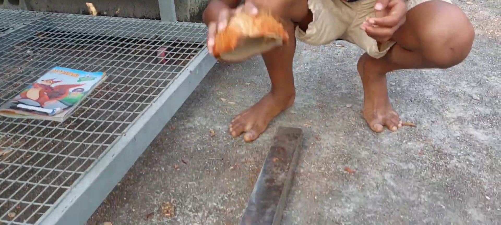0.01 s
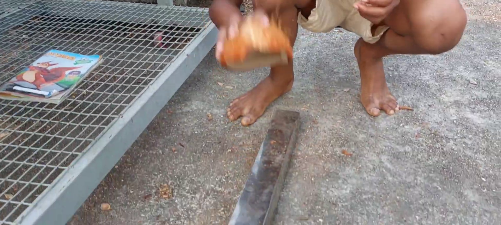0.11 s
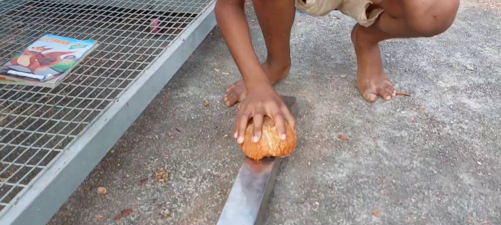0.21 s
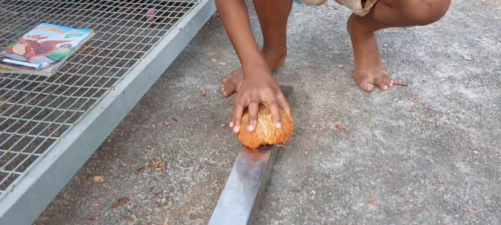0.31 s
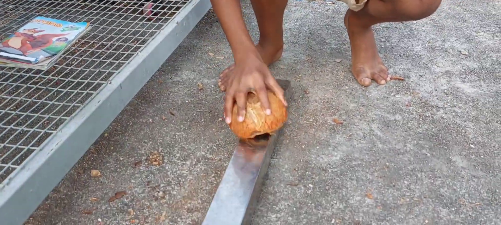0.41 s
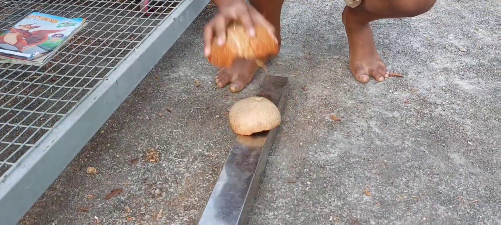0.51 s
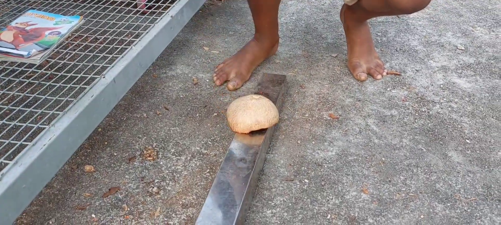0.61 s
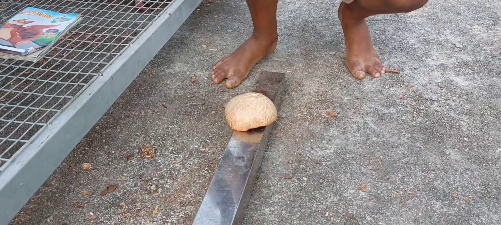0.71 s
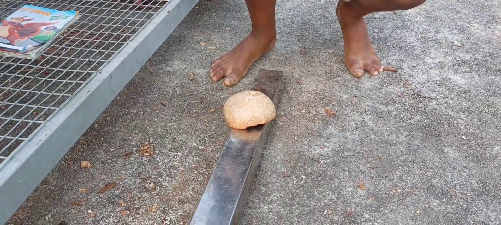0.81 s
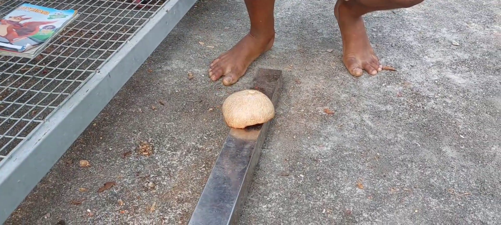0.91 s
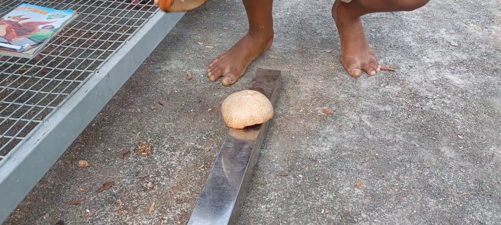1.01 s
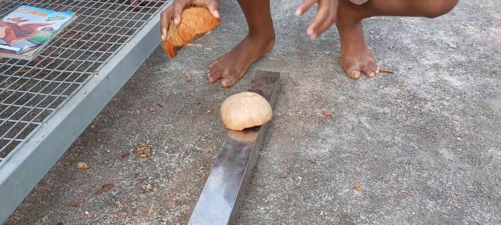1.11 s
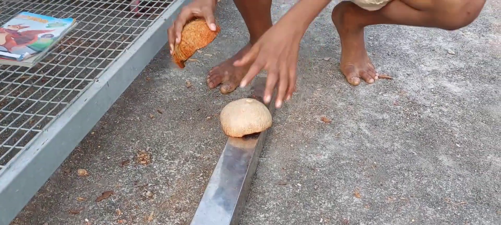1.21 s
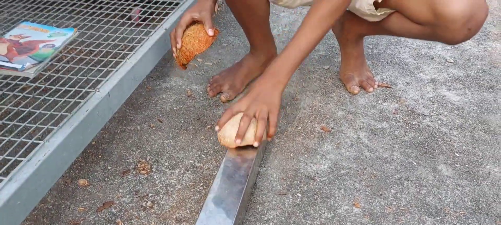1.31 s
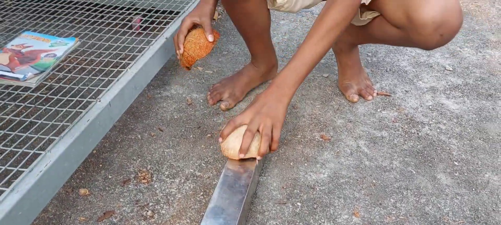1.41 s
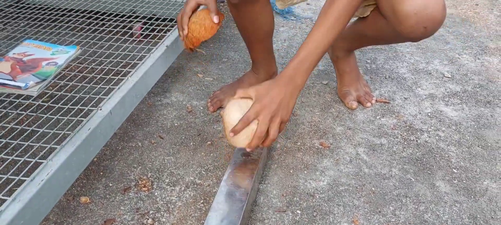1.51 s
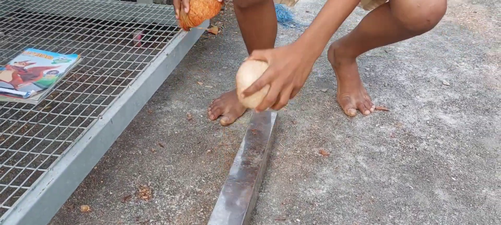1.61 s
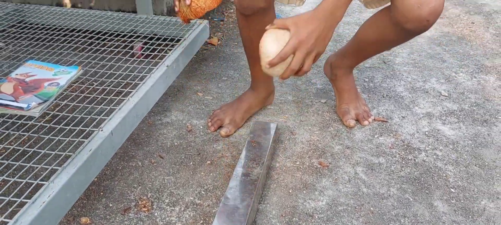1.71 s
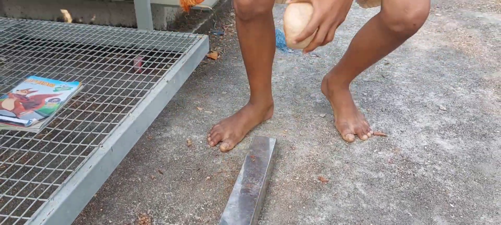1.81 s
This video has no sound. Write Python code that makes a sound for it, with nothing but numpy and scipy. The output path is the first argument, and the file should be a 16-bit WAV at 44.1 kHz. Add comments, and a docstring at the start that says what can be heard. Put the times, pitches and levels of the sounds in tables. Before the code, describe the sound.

A coconut half is slammed onto a steel bar on concrete: one very loud, clipped crack with a low thud and short metallic ring, then quiet open air, faint crows and light handling scrapes, close stereo microphone.

```python
"""Outdoors under a roof edge, a dried coconut half is slammed on a hollow steel bar lying on concrete.
The bar still rings from a blow before: its modes are decaying sines, muffled by a hand until the shell lifts.
The slam adds struck modes of shell and bar, ground knocks, a crack, a noise crash and a soft push of air.
Later a hand slides and picks up the kernel: noise grains rustle and slips excite resonances. Far crows drone as
throbbing noise over a hoot, faint tones come and go, a breeze rises on the microphone ports over steady hiss."""
import sys
import numpy as np
from scipy import signal
from scipy.io import wavfile

SR = 44100
rng = np.random.default_rng(int(sys.argv[2]) if len(sys.argv) > 2 else 0)


def magnitude_from_level(level_db):
    """Linear magnitude for a level in decibels (20 dB per decade)."""
    exponent = np.asarray(level_db, float) / 20
    return 10 ** exponent


def bounce(signal):
    """Save signal as a 16-bit WAV file at the path given by the first command-line argument."""
    frames = np.transpose(np.atleast_2d(signal))
    limited = np.clip(frames, -1, 1)
    pcm = np.round(limited * 32767).astype(np.int16)
    wavfile.write(sys.argv[1], SR, pcm)


N = 81585

# In all tables: balance_db is left minus right, lead_rad is how far the left port leads,
# t60_s is the time to fall by 60 dB, likeness is how alike the two ports are (limited to -1..1).

# Steady outdoor floor: pitch_hz, relative_db_per_hz
AIR_COLOUR = [(24, -29), (40, 1.5), (201, -7), (663, -36), (812, -11.5), (880, -27), (1240, -13),
              (1520, -22.5), (1970, -8.5), (2670, -31.5), (5000, -25), (6500, -55), (11000, -120)]
# Steady microphone hiss, with a bump near 8 kHz: pitch_hz, relative_db_per_hz
HISS_COLOUR = [(2650, -32), (4500, -2), (5630, -8.5), (7900, -1.5), (9980, -8), (10500, -13.5),
               (11400, -13.5), (15600, -20.5)]
# Balance of floor, hiss and rustle: pitch_hz, balance_db
AIR_BALANCE = [(60, 4.5), (110, 9.5), (200, 4), (380, 3.0), (700, -3.5), (1290, -5.5), (2380, 1.5),
               (4400, 0.5), (8120, 0.5), (15000, -7)]
# How alike floor, hiss and rustle are on both ports: pitch_hz, likeness
AIR_LIKENESS = [(60, 1), (130, 1), (290, 0.44), (640, -0.43), (1410, -0.27), (3100, -1.5), (6820, 0.73),
                (15000, -0.55)]
AIR_DB, HISS_DB = -68.5, -81.5

# Pitches of the bar's modes: pitch_hz
BAR_HZ = [1099, 1538, 2275, 2383, 2536, 2692, 2876, 3279, 3497, 3742, 4243, 5812]
# The same bar modes: slam_db, held_t60_s, held_balance_db, lift_gain_db, free_t60_s, free_balance_db,
# lead_rad, old_ring_start_db, rocking_dip_db (a negative dip is a boost)
BAR_MODES = [(-24.5, 0.73, 3.5, 0, .7, -3, 1.26, -59, 15), (-24.5, 0.6, 5.5, -2, 0.65, 3.5, 1.5, -89.5, 6),
             (-16, 0.25, -0.9, 2, 0.25, 2.5, 0.56, -76.5, 2.5),
             (-20.5, 0.75, 8, 1.5, 0.42, 3.5, 0.52, -71.5, 0),
             (-23, .65, -5, 6.5, 1.34, 13.5, -0.15, -43, 0.5), (-25, 0.62, 0.5, -4, .5, 6, 1.71, -72, 2),
             (-25.5, 0.9, 0.54, 4, 1.05, 1.5, 2.5, -68, 0.5),
             (-23, 0.37, -7, -12.5, 1.3, 10.5, 1.76, -61, 6), (-30.5, 0.55, -3, 2.5, .65, -3.5, -1, -85, 0),
             (-29.5, 0.68, -7.5, 15, 0.67, 0.5, 1.5, -59, 8.5),
             (-38, 0.9, -6, 0.7, 1.05, -6.5, 1.1, -62, -4), (-34, 0.49, 2.5, -0.5, .5, 8, -0.2, -100, 2.5)]
OLD_RING_EXTRA_LEAD_RAD = 2.4
SLAM_S, LIFT_S, LIFT_RISE_S = 0.2081, 0.432, 0.012
ROCKS_PER_S, ROCK_FADE_S = 14.3, 0.28
SWELL_CYCLES = 4.0

# Drone of the crows over time: time_s, relative_db
CROW_LEVEL = [(0, -80), (.2, -88.5), (.5, -69), (.7, -70), (1.0, -75.5), (1.2, -71.5), (1.42, -76.5),
              (1.6, -68), (1.85, -61.5)]
# Throat resonances of the crows: pitch_hz, width_hz, relative_db
THROATS = [(1180, 420, -5), (1840, 170, -1), (1320, 9.3, -9.5), (1916, 89, -7), (3620, 170, -16)]
THROBS_PER_S = 82
# A far hoot comes and goes: time_s, relative_db
HOOT_LEVEL = [(0, -88), (.09, -101), (.12, -75), (.55, -70.5), (.7, -68), (.96, -72.5), (1.01, -87),
              (1.07, -69), (1.24, -80), (1.3, -68), (1.43, -80), (1.5, -70.5), (1.6, -71.5), (1.68, -84),
              (1.8, -67), (1.85, -73)]
HOOT_HZ, HOOT_WAVER_HZ = 794.3, 4.4

# Breeze over time, before its lumps: time_s, level_db
BREEZE_LEVEL = [(0, -70), (.05, -77.5), (.2, -72.5), (.3, -55.5), (.45, -62.5), (.65, -67), (.8, -73.5),
                (1.0, -71.5), (1.3, -73), (1.45, -70.5), (1.6, -67.5), (1.68, -60.5), (1.74, -63.5),
                (1.79, -54.5), (1.85, -56)]
BREEZE_LOW_HZ, BREEZE_HIGH_HZ, BREEZE_BALANCE_DB = 54.6, 225, 3.5
BREEZE_SHARED = 0.4  # part of the power that both ports share

# Thin far tones: pitch_hz, level_db, start_s, end_s
FAINT_TONES = [(940, -70, 0.025, 0.3), (1470, -72, 0.12, .2), (283, -67, 0.081, 0.396),
               (1235, -71.5, 0.87, 1.3), (1415, -69.5, 0.79, 1.3), (3070, -66.5, 1.82, 2)]

# Pitches of the struck modes of shell and bar, some beating with the bar's modes above: pitch_hz
STRUCK_HZ = [285, 576, 675, 720, 940, 1300, 1432, 1670, 1708, 1781, 1857, 1906, 1938, 2030, 2133, 2217,
             2568, 3100, 3400, 3784, 867, 1147, 1249, 2372, 790]
# The same struck modes, short and long: level_db, t60_s, balance_db, lead_rad
STRUCK_MODES = [(-18, 0.073, 8, 0.63), (-29, 0.23, -5.5, 1.56), (-38.5, 0.56, -4, 0.47),
                (-26.5, 0.16, -3.5, 2), (-28, 0.16, -0.54, 2.26), (-26.5, 0.21, 0.13, 0.3),
                (-25, 0.1, 0.65, 2), (-16.5, 0.34, 1.5, 0.46), (-21.5, 0.18, -0.24, 0.9),
                (-21, 0.14, -0.67, 1), (-15.5, 0.36, -6, -2.5), (-17.5, 0.076, 0.57, 4.5),
                (-13, .22, -6.5, -0.8), (-26.5, 0.34, -0.6, 0.87), (-18, 0.59, -0.2, -3.5),
                (-14, 0.46, -3.5, 0.96), (-30.5, 0.97, -6, 2), (-26.5, 0.18, -0.36, 1.44),
                (-25, 0.18, -0.26, 1), (-24, .22, 0.64, -1.1), (-27.5, .15, -3, -0.2), (-27, .26, -2, 0.5),
                (-24.5, .15, -1.5, 1), (-29, 0.73, 2.5, 1), (-37.5, 0.33, -3, 1.8)]
# The ground knocks: pitch_hz, level_db, t60_s, balance_db, lead_rad
GROUND_MODES = [(125, -17.5, .09, 5.5, 2.4), (165, -21, 0.031, 4, 2.2), (234.94, -17.5, 0.041, 9, 1.6),
                (273.7, -40, .45, 3, .6), (476, -19.5, 0.044, -4, 0.93), (620, -22, 0.043, -5, 0.83)]
# Fine upper modes of shell and bar: pitch_hz, relative_db, t60_s before the limit below
UPPER_MODES = [(3980, -12, 0.57), (4577, -3, 0.28), (4580, -15.5, 0.72), (5700, -3, 0.2),
               (6000, -16.5, 0.25), (6120, -4.5, 0.14), (5920, -6, 0.21), (6620, 2, 0.14),
               (7080, -7.5, 0.72), (7370, -0.5, 0.22), (7610, -4, 0.2), (7881, -3, 0.2), (8650, -12, 0.18),
               (8818, -6, 0.16), (9146, -20.5, 0.18), (9640, -11, 0.1), (10430, -5.5, 0.067),
               (12820, -10, 0.14), (13700, -18, 0.19), (15400, -7, 0.13), (14100, -7, 0.11),
               (16200, -10.5, 0.14), (16100, -18, 0.18), (16000, -14, 0.15)]
UPPER_DB, UPPER_LONGEST_T60_S = -20, 0.27

# The crash of husk, grit and yard echoes: pitch_hz, relative_db_per_hz
CRASH_COLOUR = [(88, -50.5), (150, -20.5), (308, -19.5), (463, -39), (552, -23.5), (897, -20),
                (1010, -20.5), (1070, -17), (1350, -21), (1910, -4), (4010, -17), (5200, -21), (6800, -17),
                (15600, -26)]
# How fast the crash dies, and the slower echo of the yard: pitch_hz, t60_s
CRASH_T60 = [(130, 0.062), (350, 0.24), (900, 0.16), (2000, 0.15), (4000, .19), (7000, 0.16),
             (11000, 0.079), (16000, 0.2)]
YARD_T60 = [(100, 0.5), (400, 0.24), (1000, 0.69), (2500, .55), (5000, 0.62), (8000, 0.32), (15000, 0.39)]
# Balance of the crash: pitch_hz, balance_db
CRASH_BALANCE = [(60, -1), (110, 1.5), (200, 5.5), (380, 3.5), (700, -7.5), (1290, -2), (2380, 0),
                 (4400, 0.5), (8120, 1), (15000, -12.5)]
# How alike the crash is on both ports: pitch_hz, likeness
CRASH_LIKENESS = [(60, 0.72), (130, 0.78), (290, 0.23), (640, 0.6), (1410, 0.34), (3100, -0.14),
                  (6820, 0.1), (15000, 0.1)]
# How fast the crash builds up: pitch_hz, time_constant_s
CRASH_RISE = [(50, 0.0047), (500, 0.0029), (2000, 0.0062), (16000, 0.00037)]
CRASH_DB = -11  # mean level of the first 50 ms
YARD_DB = -21  # yard echo against the crash
RATTLE_DB, RATTLE_HZ = 1.8, 260
CRACK_GAIN_DB, CRACK_S = 4.5, 0.011
PUSH_DB, PUSH_HZ, PUSH_S, PUSH_SKEW, PUSH_LEAD_RAD = -16.5, 60, 0.038, 0.7, 2.0

TICK_S, TICK_DB, TICK_HZ, TICK_FADE_S = 0.731, -61.5, 8070, 0.003
# Hand, cloth and feet on grit: time_s, relative_db, balance_db
RUSTLE_LEVEL = [(1.08, -91, -2.0), (1.122, -78, -2), (1.17, -75, 3), (1.224, -74.5, -1.5),
                (1.246, -69, 0.5), (1.292, -82, -0.5), (1.366, -74.5, 0), (1.374, -78, 0),
                (1.536, -79.5, -2), (1.618, -73.5, -1), (1.632, -78, -3), (1.67, -75, -3),
                (1.68, -67.5, -3), (1.694, -73, -2.5), (1.716, -64.5, -0.5), (1.722, -74, -5.5),
                (1.768, -78, -1.0), (1.826, -77, -1.0), (1.84, -69.5, -2.5), (1.85, -74, -2.5)]
# Colour of the rustle: pitch_hz, relative_db_per_hz
RUSTLE_COLOUR = [(2350, -27), (4000, -4.5), (4560, -7), (4940, -2.5), (5890, -8), (7700, 5), (8540, -8),
                 (12700, -0.5), (15600, -5)]
# Two slides of the kernel on the bar, one list each: time_s, relative_db
SLIDES = [
    [(1.09, -82), (1.124, -66), (1.176, -64.5), (1.214, -66.5), (1.26, -71), (1.414, -80), (1.42, -99.5)],
    [(1.67, -88), (1.712, -68.5), (1.768, -74.5), (1.84, -66.5), (1.85, -69)],
]
# Modes of the slides: pitch_hz, width_hz, first_relative_db, joins_after_s, fade_db_per_s, second_relative_db
SLIDE_MODES = [(3560, 90, -14, 0.08, 20, 0.5), (3722, 150, 0, .05, 45, -0.5),
               (4120, 350, 1.5, 0.041, 0.1, -3.5), (4430, 110, 5.5, 0.007, 68, -5),
               (4730, 340, -15, 0.02, 10, -2.5), (6180, 100, -5, 0.077, -8, -23),
               (6930, 440, -6, 0.03, 10, -11), (7600, 250, -6, 0.024, 30, -4)]
CEILING = 1.0  # full scale of the converter


def secs():
    """Time in seconds at each sample."""
    return np.arange(N) / SR


def rms_one(x):
    """Scales a sound to an average strength (rms) of 1."""
    return x / np.sqrt(np.mean(x ** 2) + 1e-20)


def in_time(rows, outside=None):
    """Joins the points of a timed table with straight lines, one curve per column."""
    times, *columns = np.transpose(rows)
    return [np.interp(secs(), times, column, outside, outside) for column in columns]


def at_hz(points, hz):
    """Reads a table at a pitch, in straight lines over log pitch."""
    points = np.array(points)
    return np.interp(np.log(hz), np.log(points[:, 0]), points[:, 1])


def panned(balance_db):
    """Left and right gains, half of the balance on each."""
    return magnitude_from_level(np.array([balance_db / 2, -balance_db / 2]).reshape(2, -1))


def drift(rate_hz):
    """Slow random wandering of rms 1: noise through two low-pass poles, made at every 40th sample."""
    r = np.exp(-2 * np.pi * rate_hz * 40 / SR)
    noise = rng.standard_normal(N // 40 + 2002)
    slow = signal.lfilter([1], [1, -2 * r, r * r], noise)[2000:]
    return np.interp(np.arange(N) / 40, np.arange(len(slow)), rms_one(slow))


def resonate(x, hz, width_hz):
    """A two-pole resonance that rings at one pitch."""
    r = np.exp(-np.pi * width_hz / SR)
    return signal.lfilter([1, 0, -1], [1, -2 * r * np.cos(2 * np.pi * hz / SR), r * r], x)


def tone(hz, lead_rad, start_s):
    """A sine on both ports, the left ahead in phase; it swells in from its start."""
    t = np.maximum(secs() - start_s, 0)
    # the swell's time constant never exceeds that of a 2200 Hz tone
    swell = 1 - np.exp(-t * max(hz, 2200) / SWELL_CYCLES)
    phase = np.array([[lead_rad / 2], [-lead_rad / 2]])
    return swell * np.sin(2 * np.pi * hz * t + phase)


def band_pass(x, low_hz, high_hz):
    """Keeps mostly the sound between two pitches."""
    return signal.sosfilt(signal.butter(2, [low_hz, high_hz], "band", fs=SR, output="sos"), x)


def bands(colour, balance, likeness, shape, source):
    """Third-octave bands of stereo noise, each with level, balance, likeness and shape(hz) in time."""
    out = 0
    edges = 36 * 2 ** np.arange(0, 9.1, 1 / 3)
    for k, (low, high) in enumerate(zip(edges, edges[1:])):
        hz = np.sqrt(low * high)
        if colour[0][0] <= hz <= colour[-1][0] * 2 ** (1 / 6):
            mid, side = band_pass(source[k % 2], low, high)  # neighbours use different noise
            alike = np.clip(at_hz(likeness, hz), -1, 1)
            both = np.sqrt(1 + alike) * mid + np.sqrt(1 - alike) * side * [[1], [-1]]
            out = out + magnitude_from_level(at_hz(colour, hz)) * panned(at_hz(balance, hz)) * both * shape(hz)
    return out


def steady_noise(colour, level_db):
    """A steady bed of noise whose bands waver slowly and separately."""
    noise = rng.standard_normal((2, 2, N))
    bed = bands(colour, AIR_BALANCE, AIR_LIKENESS, lambda hz: magnitude_from_level(2.0 * drift(14)), noise)
    return magnitude_from_level(level_db) * rms_one(bed)


def outdoor_floor():
    """The steady sound of the open air."""
    return steady_noise(AIR_COLOUR, AIR_DB)


def microphone_hiss():
    """Steady hiss of the microphone, with a bump near 8 kHz."""
    return steady_noise(HISS_COLOUR, HISS_DB)


def bar():
    """Modes fall at one rate under the hand and another once it lifts; the old ring stops at the slam."""
    since_slam, out = secs() - SLAM_S, 0
    held = np.clip(since_slam, 0, LIFT_S - SLAM_S)
    free = np.maximum(secs() - LIFT_S, 0)
    lifted = np.clip(0.5 + (secs() - LIFT_S) / (2 * LIFT_RISE_S), 0, 1)
    # the freed kernel rocks and touches the bar, less and less
    touch = np.clip(1 + (secs() - LIFT_S) / LIFT_RISE_S, 0, 1) * np.exp(-free / ROCK_FADE_S)
    touch = touch * np.cos(np.pi * ROCKS_PER_S * free) ** 12
    for hz, row in zip(BAR_HZ, BAR_MODES):
        slam_db, held_t60, held_balance, lift_db, free_t60, free_balance, lead, old_db, dip_db = row
        decay_db = -60 * held / held_t60 - 60 * free / free_t60
        level = magnitude_from_level(slam_db + decay_db + lift_db * lifted - dip_db * touch)
        balance = held_balance + (free_balance - held_balance) * lifted
        out = out + (since_slam > 0) * level * panned(balance) * tone(hz, lead, SLAM_S)
        # the old ring began before time zero, so its swell is already over
        old_ring = panned(free_balance) * tone(hz, lead + OLD_RING_EXTRA_LEAD_RAD, -1)
        out = out + (since_slam <= 0) * magnitude_from_level(old_db - 60 * secs() / free_t60) * old_ring
    return out


def crows():
    """Many far hoarse caws blur into throbbing noise in throat resonances."""
    throb_hz = THROBS_PER_S * (1 + 0.018 * drift(5.5))
    throb = 1 + 0.48 * np.sin(2 * np.pi * np.cumsum(throb_hz) / SR)
    voice = rng.standard_normal((2, N)) * throb * magnitude_from_level(2.0 * drift(5.5))
    caws = 0
    for hz, width, db in THROATS:
        throat = resonate(resonate(voice, hz, width), hz, 2.2 * width)
        caws = caws + magnitude_from_level(db) * rms_one(throat)
    return magnitude_from_level(in_time(CROW_LEVEL)[0] + 5.5) * rms_one(caws) * panned(-2.5)


def hoot():
    """A far hoot below the caws: a sine whose pitch and level waver."""
    turn = 2 * np.pi * np.cumsum(HOOT_HZ + HOOT_WAVER_HZ * drift(8)) / SR
    voice = np.sin(turn + np.array([[1.7], [0]])) * magnitude_from_level(1.5 * drift(15))
    return magnitude_from_level(in_time(HOOT_LEVEL)[0] + 4.5) * voice * panned(-7.0)


def breeze():
    """Lumpy low noise on the ports, partly shared by both and stronger on the left."""
    shared, *own = band_pass(rng.standard_normal((3, N)), BREEZE_LOW_HZ, BREEZE_HIGH_HZ)
    air = rms_one(np.sqrt(BREEZE_SHARED) * shared + np.sqrt(1 - BREEZE_SHARED) * np.array(own))
    return magnitude_from_level(in_time(BREEZE_LEVEL)[0] + 0.74 * drift(21)) * air * panned(BREEZE_BALANCE_DB)


def faint_tones():
    """Thin far sines fade in and out over 17 ms."""
    out = 0
    for hz, db, start, end in FAINT_TONES:
        fade = np.clip(np.minimum(secs() - start, end - secs()) / 0.017, 0, 1)
        out = out + magnitude_from_level(db) * fade * tone(hz, 2.1, 0)
    return out


def struck(modes):
    """Sines set off by the slam, each dying at its own rate."""
    t, out = np.maximum(secs() - SLAM_S, 0), 0
    for hz, db, t60, balance, lead in modes:
        out = out + (t > 0) * magnitude_from_level(db - 60 * t / t60) * panned(balance) * tone(hz, lead, SLAM_S)
    return out


def shell_and_bar_modes():
    """Struck modes of shell and bar, short and long, some beating with the bar's modes."""
    return struck([(hz, *row) for hz, row in zip(STRUCK_HZ, STRUCK_MODES)])


def ground_thump():
    """The ground knocks: low dying modes make a thud."""
    return struck(GROUND_MODES)


def upper_modes():
    """Fine high modes of shell and bar, each with a random balance and lead."""
    chances = rng.uniform(-1.3, 1, (len(UPPER_MODES), 2))
    return struck([(hz, db + UPPER_DB, min(t60, UPPER_LONGEST_T60_S), 5.2 * a, np.pi * b)
                   for (hz, db, t60), (a, b) in zip(UPPER_MODES, chances)])


def crash():
    """Rattling noise of husk and grit that dies band by band into the slower echo of the yard."""
    t = np.maximum(secs() - SLAM_S, 0)

    def dying(hz):
        rise = 1 - np.exp(-t / at_hz(CRASH_RISE, hz))
        direct = magnitude_from_level(-60 * t / at_hz(CRASH_T60, hz))
        yard = magnitude_from_level(YARD_DB - 60 * t / at_hz(YARD_T60, hz))
        return rise * (direct + yard)

    rattle = rng.standard_normal((2, 2, N)) * magnitude_from_level(RATTLE_DB * drift(RATTLE_HZ))
    noise = bands(CRASH_COLOUR, CRASH_BALANCE, CRASH_LIKENESS, dying, rattle)
    onset = noise[:, t > 0][:, :SR // 20]
    return magnitude_from_level(CRASH_DB) * noise / np.sqrt(np.mean(onset ** 2))


def crack():
    """A very short burst of noise in the middle pitches."""
    t = np.maximum(secs() - SLAM_S, 0)
    burst = (t > 0) * np.exp(-t / CRACK_S) * rng.standard_normal((2, N))
    return magnitude_from_level(CRACK_GAIN_DB) * band_pass(burst + 1e-18, 1100, 3600)


def push():
    """Air squeezed from under the shell: one soft low swell."""
    share = np.clip((secs() - SLAM_S) / PUSH_S, 0, 1)
    swell = np.sin(np.pi * share ** PUSH_SKEW) ** 2
    return magnitude_from_level(PUSH_DB) * swell * tone(PUSH_HZ, PUSH_LEAD_RAD, SLAM_S)


def crumb_tick():
    """One crumb ticks: resonant noise that dies in a few milliseconds."""
    t = np.maximum(secs() - TICK_S, 0)
    noise = rms_one(resonate(rng.standard_normal((2, N)), TICK_HZ, 5000))
    return magnitude_from_level(TICK_DB) * noise * (t > 0) * np.exp(-t / TICK_FADE_S)


def rustle():
    """Hand, cloth and feet on grit: clumped fine grains of noise."""
    db, balance = in_time(RUSTLE_LEVEL)
    grains = rng.standard_normal((2, 2, N)) * magnitude_from_level(1.2 * drift(80))
    noise = bands(RUSTLE_COLOUR, AIR_BALANCE, AIR_LIKENESS, lambda hz: magnitude_from_level(1.8 * drift(16)), grains)
    return magnitude_from_level(db + 4.0) * (secs() > RUSTLE_LEVEL[0][0]) * panned(balance) * rms_one(noise)


def kernel_slide():
    """The kernel slides on the bar: dense slips excite modes that join, then change level, in turn."""
    slips = rng.standard_normal((2, N)) * magnitude_from_level(2.0 * drift(70))
    first, second = [magnitude_from_level(in_time(slide, -150)[0]) for slide in SLIDES]
    since_first, out = secs() - SLIDES[0][0][0], 0
    for hz, width, first_db, late, fade, second_db in SLIDE_MODES:
        ringing = magnitude_from_level(2.0 * drift(10) - 3.5) * rms_one(resonate(slips, hz, width))
        since_join = since_first - late
        joined = np.clip(since_join / 0.021, 0, 1)
        first_part = magnitude_from_level(first_db - fade * np.clip(since_join, 0, 0.3)) * first * joined
        out = out + ringing * (first_part + magnitude_from_level(second_db) * second)
    return out


def scene():
    """All sources over the steady outdoor floor and microphone hiss."""
    background = outdoor_floor() + microphone_hiss()
    far = crows() + hoot() + faint_tones()
    slam = bar() + shell_and_bar_modes() + ground_thump() + upper_modes() + crash() + crack() + push()
    handling = crumb_tick() + rustle() + kernel_slide()
    return background + far + breeze() + slam + handling


def top_cut(x):
    """Nothing passes above the cut-off."""
    return signal.sosfilt(signal.butter(12, 15770, fs=SR, output="sos"), x)


def record(dry):
    """Deep rumble is filtered off below 40 Hz; the slam overloads the converter, which clips it."""
    low_cut = signal.butter(2, 40, "high", fs=SR, output="sos")
    mix = np.clip(signal.sosfilt(low_cut, dry), -CEILING, CEILING)
    return top_cut(mix)


dry = scene()
out = record(dry)
bounce(out)
```